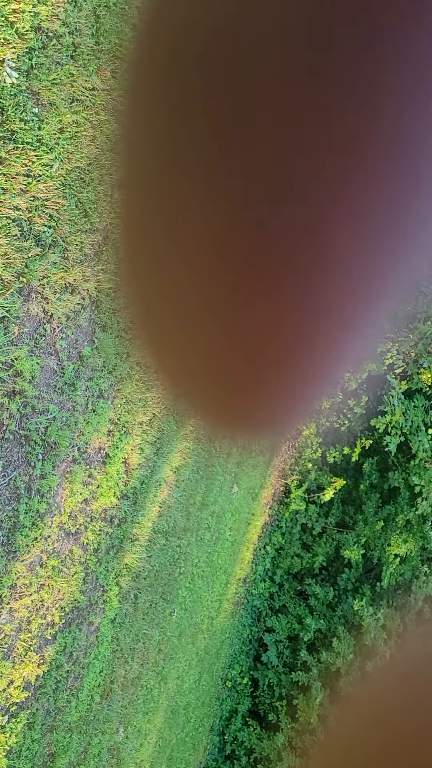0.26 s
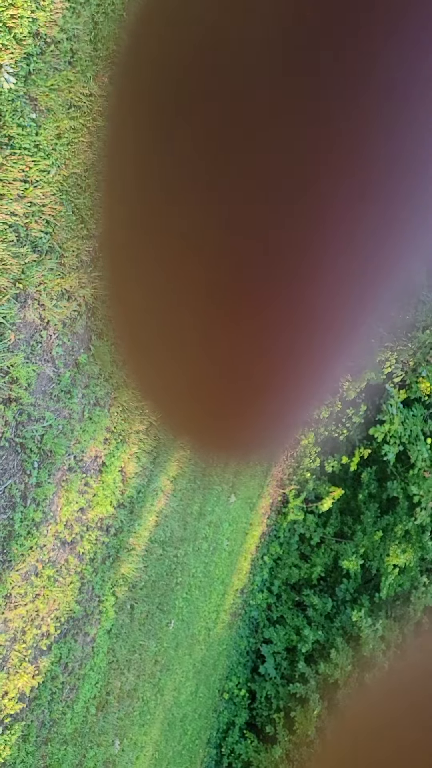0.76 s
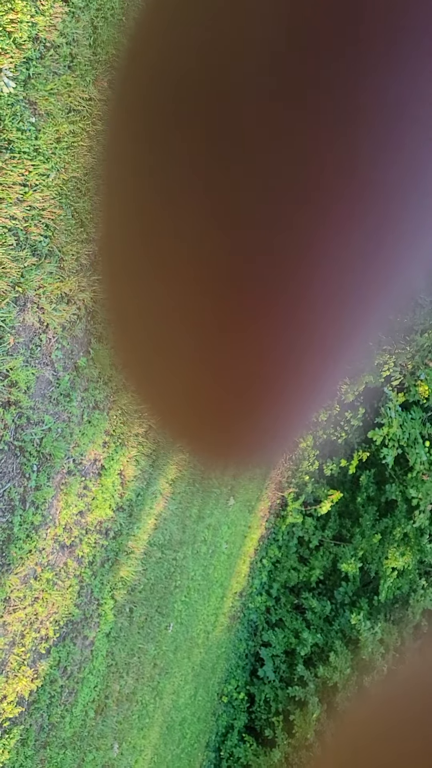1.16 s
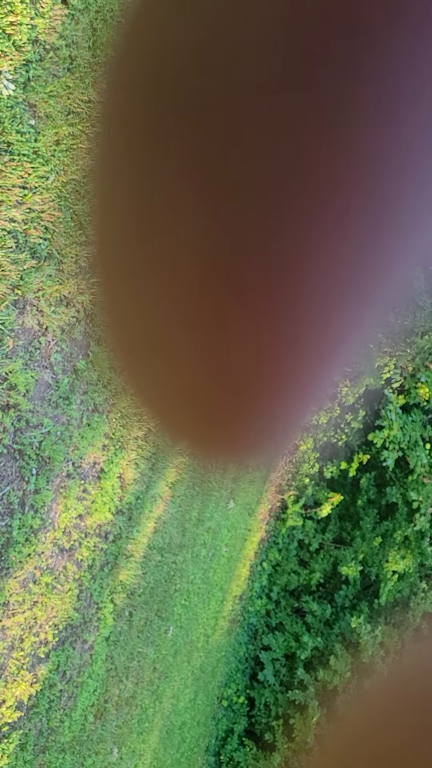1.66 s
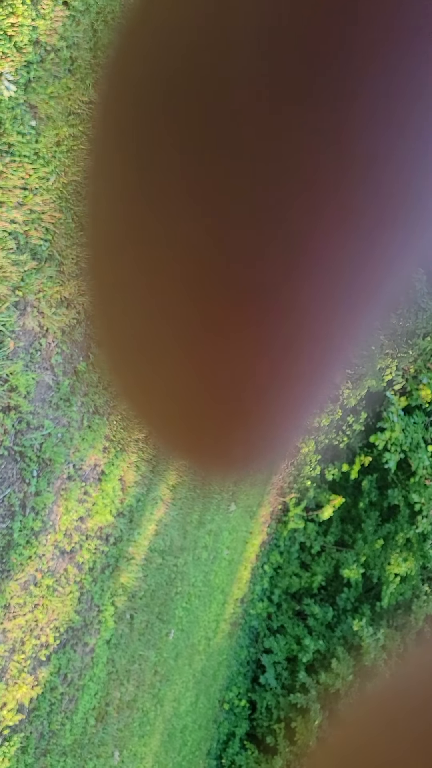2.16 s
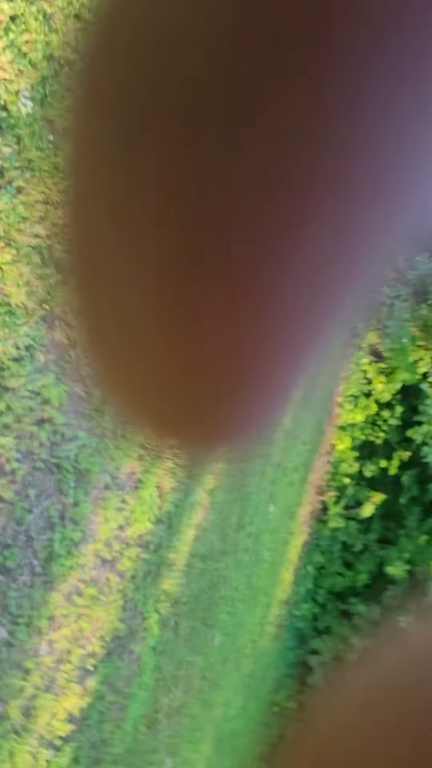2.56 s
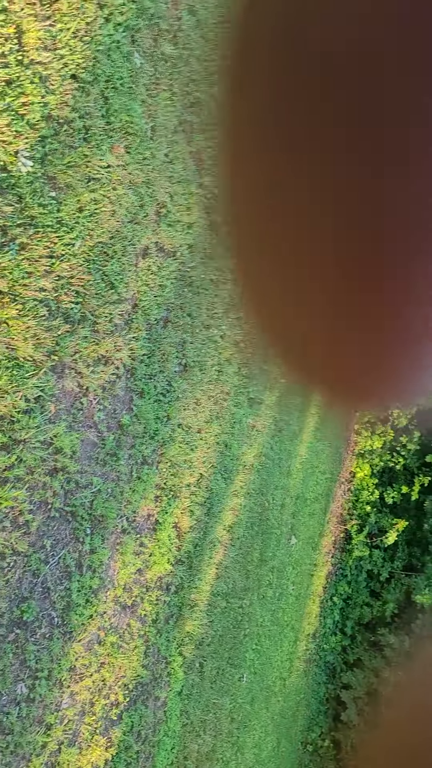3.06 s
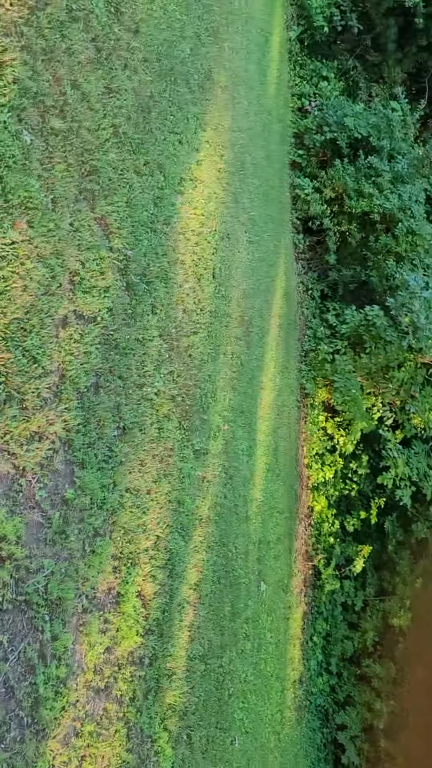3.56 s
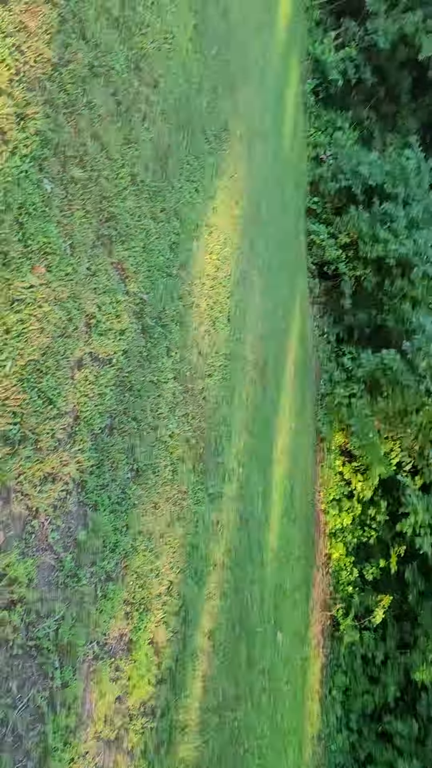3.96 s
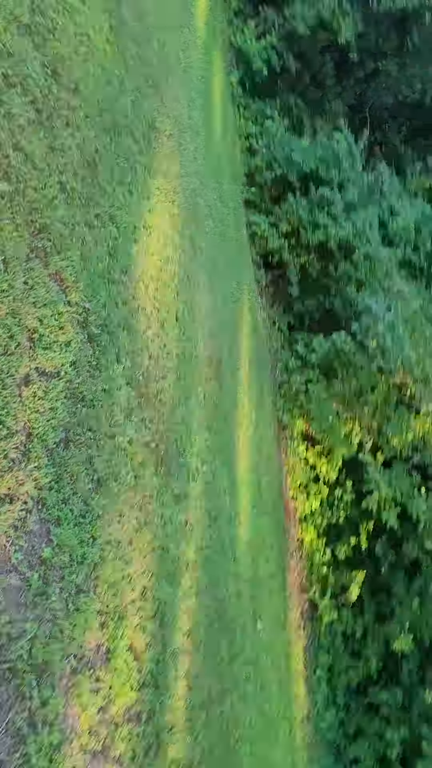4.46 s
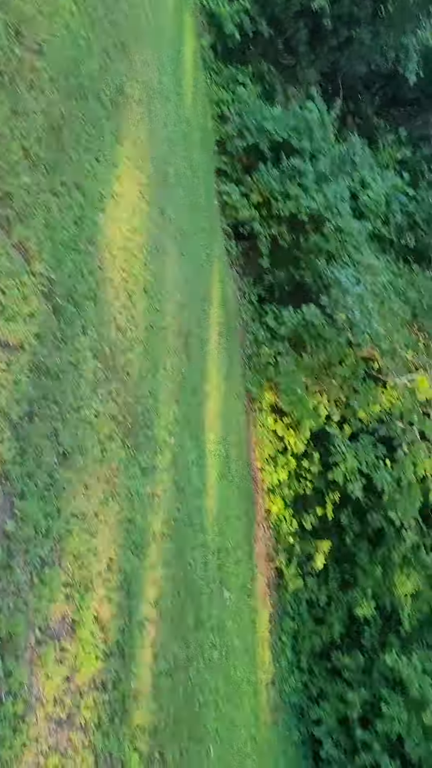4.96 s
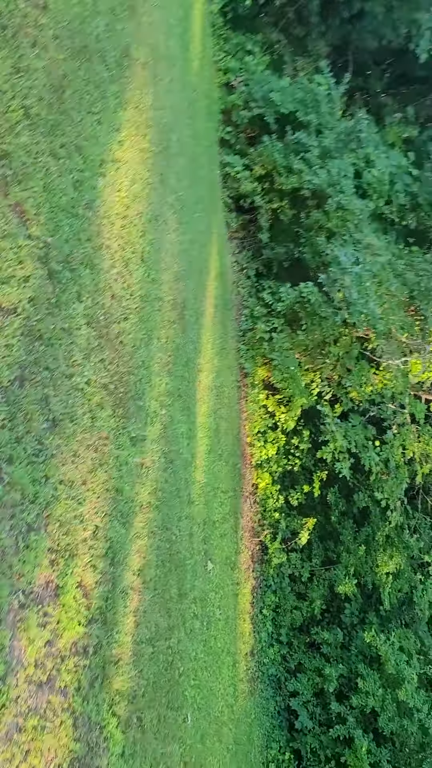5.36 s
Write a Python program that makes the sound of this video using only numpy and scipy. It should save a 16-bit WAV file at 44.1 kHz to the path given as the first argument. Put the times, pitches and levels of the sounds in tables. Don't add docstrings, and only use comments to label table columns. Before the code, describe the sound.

A faint throbbing bird whistle over soft outdoor hiss gives way to skin rubbing, fingers knocking and low thumps on a handheld phone.

```python
import sys
import numpy as np
from scipy import signal
from scipy.fft import rfft, irfft, next_fast_len
from scipy.io import wavfile

SR = 44100
rng = np.random.default_rng(int(sys.argv[2]) if len(sys.argv) > 2 else 0)


def boost(x):
    u = np.asarray(x, float) / 20
    return 10 ** u


def pcm_store(signal):
    levels = np.round(np.clip(np.atleast_2d(signal), -1, 1) * 32767)
    wavfile.write(sys.argv[1], SR, levels.astype(np.int16).T)


N = 247479


def rms_one(x):
    return x / np.sqrt(np.mean(x ** 2) + 1e-20)


def peak_one(x):
    return x / np.max(np.abs(x))


def in_time(rows):
    s, *columns = np.transpose(rows)
    t = np.arange(N) / SR
    gate = np.interp(t, [s[0] - .004, s[0], s[-1], s[-1] + .004], [0, 1, 1, 0])
    return [gate] + [np.interp(t, s, c) for c in columns]


def drift(rate_hz):
    r = np.exp(-80 * np.pi * rate_hz / SR)
    noise = rng.standard_normal(N // 40 + 2002)
    slow = signal.lfilter([1], [1, -2 * r, r * r], noise)[2000:]
    return np.interp(np.arange(N) / 40, np.arange(len(slow)), rms_one(slow))


def coloured(x, spectrum):
    size = next_fast_len(N)
    hz = np.maximum(np.arange(size // 2 + 1) * SR / size, 1)
    points = np.array(spectrum)
    gain = boost(np.interp(np.log(hz), np.log(points[:, 0]), points[:, 1]))
    return rms_one(irfft(rfft(x, size) * gain, size)[..., :N])


def band(x, low_hz, high_hz):
    return signal.sosfilt(signal.butter(2, [low_hz, min(high_hz, .45 * SR)], "band", fs=SR, output="sos"), x)


def dull(x, hz):
    return signal.sosfilt(signal.butter(2, hz, fs=SR, output="sos"), x)


def ring(x, hz, t60):
    r, w = boost(-60 / (t60 * SR)), 2 * np.pi * hz / SR
    return signal.lfilter([0, np.sin(w)], [1, -2 * r * np.cos(w), r * r], x)


def delayed(x, seconds):
    return np.interp(np.arange(len(x)) - seconds * SR, np.arange(len(x)), x, left=0)


def swell(top_s, held_s, rise_db_per_s, fall_db_per_s):
    t = np.arange(N) / SR - top_s
    return np.minimum(rise_db_per_s * t, 0) - fall_db_per_s * np.maximum(t - held_s, 0)


def pan(db):
    return np.array([boost(np.asarray(db) / 2), boost(-np.asarray(db) / 2)])


def add(out, s, pulse, pan_db):
    at = round(s * SR)
    out[:, at:at + pulse.shape[-1]] += (pan(pan_db)[:, None] * pulse)[:, :N - at]


def meadow():
    # hz, level_db (per Hz)
    air_mid = [(15, -57), (25, -7), (64, 0.5), (129, -7.5), (156, -6.5), (186, -5.5), (277, -12.5),
               (492, -14.5), (824, -15), (997, -24), (1250, -24), (1430, -28.5), (2400, -38.5), (3120, -45),
               (5280, -120)]
    # hz, level_db (per Hz)
    air_side = [(15, -59), (25, -24), (65, -6.5), (122, -7.5), (153, 3.5), (193, -28), (225, -4),
                (473, -8.5), (501, -5), (707, -6), (2400, -24.5), (3120, -74), (5280, -120)]
    # pitch_hz, width_hz, level_db
    hum = [
        (79, 6.6, -73.5),
        (150.2, 20.3, -69.5),
        (226.6, 10.6, -76.5),
    ]
    port_lag_s, self_noise_db = 0.00035, -95
    common, other = rfft(rng.standard_normal((2, N)))
    hz = np.arange(len(common)) * SR / N
    tied = 0.55 * np.tanh(2.5 * np.sin(2 * np.pi * hz * port_lag_s)) * np.exp(-hz / 3000)
    opposed = irfft(1j * tied * common + np.sqrt(1 - tied ** 2) * other, N)
    mid = boost(-64 + 1.1 * drift(2.1)) * coloured(irfft(common, N), air_mid)
    side = boost(-67.5 + 1.7 * drift(0.76)) * coloured(opposed, air_side)
    for pitch_hz, width_hz, db in hum:
        mid = mid + boost(db) * rms_one(band(rng.standard_normal(N), pitch_hz - width_hz / 2, pitch_hz + width_hz / 2))
    return np.array([mid + side, mid - side]) + boost(self_noise_db) * rng.standard_normal((2, N))


def leaves():
    # hz, level_db (per Hz)
    foliage = [(1180, -23), (2000, -2), (2200, -1.5), (2570, -4.5), (2970, 2), (3180, 4), (3530, 0),
               (3840, 0.5), (4530, -9), (5370, -2), (6330, -9), (7200, -23.5), (8920, -16.5), (9980, -36),
               (15600, -25.5)]
    # hz, left_over_right_db
    lean = [(2000, -2), (4400, -10), (6500, 7), (8100, -1.5), (10000, -4), (15000, 1)]
    hz, db = np.transpose(foliage)
    lean_db = np.interp(hz, *np.transpose(lean)) / 2
    ports = [coloured(rng.standard_normal(N), np.c_[hz, db + sign * lean_db]) for sign in (1, -1)]
    return boost(-73.5) * np.array(ports)


def tone(hz, db, scatter):
    phase = 2 * np.pi * np.cumsum(hz) / SR
    flutter = [scatter * drift(35) for path in range(4)]
    return np.array([boost(db + 8 + 12 * flutter[k]) * np.sin(phase + 1.6 * flutter[k + 2] - 2.3 * k)
                     for k in range(2)])


def whistles(rows, sag_hz, scatter):
    t = np.arange(N) / SR
    db = np.array([top_db + swell(s, held_s, 400, fade) for s, _, top_db, held_s, fade in rows])
    hz = np.array([top_hz - sag_hz * np.clip((t - s) / (held_s + 0.031), 0, 2)
                   for s, top_hz, _, held_s, _ in rows])
    sounding_hz = np.take_along_axis(hz, db.argmax(axis=0)[None], axis=0)[0]
    return pan(2.5)[:, None] * tone(sounding_hz, db.max(axis=0), scatter)


def coo():
    # top_hz, top_db, lower_hz (at the ends), lower_db (at the ends)
    partials = [
        (1680, -76.5, 45, 8),
        (2246, -73.5, 100, 1.5),
    ]
    middle_s, half_s = 1.006, .054
    arch = ((np.arange(N) / SR - middle_s) / half_s) ** 2
    return sum(tone(hz - lower_hz * np.minimum(arch, 2), db - lower_db * arch - 3 * arch ** 4, scatter=.13)
               for hz, db, lower_hz, lower_db in partials)


def trill():
    start_s, end_s = 0.35, 0.85
    since = np.maximum(np.arange(N) / SR - start_s, 0)
    db = -72.5 - 23 * since + swell(start_s, end_s - start_s, 2000, 60)
    edge_hz = np.maximum(6760 - 22000 * since, 3300)
    out = np.zeros((2, N))
    for hz, tint_db in [(3800, -4), (4350, 3.0), (5000, 2.0), (5400, 5), (6000, -2.5), (6500, -6.0)]:
        reached = 1 / (1 + np.exp((edge_hz - hz) / 120))
        out += reached * boost(db + tint_db) * rms_one(band(rng.standard_normal((2, N)), .965 * hz, 1.035 * hz))
    return out


def birds():
    # loudest_s, pitch_hz, level_db, held_s, fade_db_per_s
    long_whistle = [
        (.012, 2636, -65, .006, 800),
        (.062, 2586, -63, .018, 330),
        (.135, 2580, -63.5, .045, 220),
        (.235, 2582, -67.5, .02, 250),
        (.305, 2572, -67, .012, 250),
        (.365, 2584, -70.5, .02, 250),
        (.44, 2590, -71.5, .02, 300),
        (.515, 2580, -81, .01, 300),
        (.575, 2565, -80, .04, 150),
    ]
    # loudest_s, pitch_hz, level_db, held_s, fade_db_per_s
    later_notes = [
        (3.79, 2770, -71, .005, 350),
        (4.228, 2775, -67.5, .03, 220),
        (4.362, 2800, -73.5, .01, 300),
        (4.575, 3020, -73.5, .012, 400),
        (4.608, 3140, -77, .01, 400),
        (4.645, 2800, -73, .035, 300),
        (4.768, 2460, -78, .003, 900),
        (4.785, 2800, -80, .07, 200),
    ]
    calls = whistles(later_notes, sag_hz=55, scatter=.27) + whistles(long_whistle, sag_hz=8, scatter=.19)
    return calls + trill() + coo()


def far_port(x):
    turn_hz, lag_s = 92, 0.00015
    mode_hz, mode_width_hz, mode_db = 440, 295, -6
    k = np.tan(np.pi * turn_hz / SR)
    turned = signal.lfilter([(k - 1) / (k + 1), 1], [1, (k - 1) / (k + 1)], x[1])
    case = boost(mode_db) * band(turned, mode_hz - mode_width_hz / 2, mode_hz + mode_width_hz / 2)
    port = 0.87 * band(turned, 2700, 3300)
    return np.array([x[0], delayed(turned + case + port, lag_s)])


def palm(x):
    # time_s, pocket_lift_db
    grip = [
        (2.6, -9),
        (3.2, -4),
        (3.36, -6.5),
        (3.56, 3),
        (3.72, -1),
        (3.92, -1),
        (4.3, 1.5),
        (4.5, 3.5),
        (4.72, 0.3),
        (5.3, -2),
    ]
    pocket = signal.lfilter(*signal.butter(1, [1680, 2690], "band", fs=SR), x + 1e-18)
    return x + (boost(in_time(grip)[1]) - 1) * pocket


def ticks(rows, broad_db):
    out, t = np.zeros((2, N)), np.arange(round(.02 * SR)) / SR
    for s, db, hz, pan_db in rows:
        snap = rng.standard_normal(len(t)) * boost(-60 * t / 0.0081)
        narrow = peak_one(band(snap, 0.934 * hz, 1.146 * hz))
        broad = boost(broad_db) * peak_one(band(snap, 800, 5500))
        add(out, s, boost(db + 0.5) * dull(narrow + broad, 9400), pan_db)
    return out


def nails_and_skin():
    # time_s, peak_db, pitch_hz, pan_left_db
    nail_ticks = [(2.0485, -55.5, 5500, 13), (2.0657, -57, 6100, 12), (2.135, -60, 4480, 1.5),
                  (2.6559, -54.5, 5400, 18), (2.8609, -59.5, 3150, -11), (3.3098, -47.5, 3000, 15),
                  (3.341, -55, 2840, 3), (3.5189, -39, 5400, 9.5), (3.8531, -54, 4160, 9),
                  (3.9022, -23.5, 2710, 3), (3.919, -37.5, 2050, 12), (4.3685, -55, 5850, 21),
                  (4.561, -47, 4860, -2), (5.0978, -44.5, 2500, 2), (5.2744, -38, 1880, 1)]
    # time_s, peak_db, pitch_hz, pan_left_db
    skin_snaps = [(2.0053, -64, 5660, 8), (2.6035, -57, 2820, 25), (2.604, -48, 3850, 7),
                  (2.6204, -52, 4230, 18), (2.6604, -55, 4020, -4), (3.5314, -49, 4770, 13),
                  (3.6371, -41, 2840, 6), (3.9274, -50, 4400, 8), (3.9933, -53, 2430, -1),
                  (4.2544, -62, 2640, 6), (4.5374, -42, 4120, 11), (4.6967, -47, 4550, 11),
                  (4.6968, -44.5, 1780, 11), (4.9244, -57, 4270, 17)]
    return ticks(nail_ticks, broad_db=-34) + ticks(skin_snaps, broad_db=5)


def thumps():
    # time_s, peak_db, pitch_hz, pan_left_db, right_lag_cycles
    pushes = [(2.63, -52, 80, -9, 0.24), (2.699, -53, 141, -15, 0.21), (3.364, -21, 183, 6.5, 0.23),
              (3.557, -21.5, 89, 9, 0.35), (3.578, -29, 81, 3.5, 0.18), (3.658, -29.5, 63, -11.5, 0.15),
              (3.9, -28, 175, -8, 0.58), (4.251, -44.5, 158, -8, 0.13), (4.508, -33, 120, 5, 0.14),
              (4.519, -33.5, 83, 5, 0.13), (4.538, -30, 73, 5, 0.11), (4.712, -34, 85, 17.5, 0.33),
              (5.244, -36, 67, 2.5, 0.12), (5.249, -36, 189, -1, 0.16), (5.47, -43.5, 177, 7, .2)]
    out, t = np.zeros((2, N)), np.arange(round(.12 * SR)) / SR
    for s, db, hz, pan_db, lag_cycles in pushes:
        push = np.sin(np.pi * np.minimum(2 * hz * t, 1)) ** 2
        swing = peak_one(band(ring(push, hz, 1.85 / hz), 0.7 * hz, 890))
        add(out, s, -boost(db + 0.5) * np.array([swing, delayed(swing, lag_cycles / hz)]), pan_db)
    return out


def knocks(rows, cycles):
    out, t = np.zeros((2, N)), np.arange(round(.06 * SR)) / SR
    for s, left_db, hz, crack_db, right_db in rows:
        t60 = cycles / hz
        contact = np.sin(np.pi * np.minimum(4.4 * hz * t, 1)) ** 2
        near = ring(contact, 1.23 * hz, t60) - 0.86 * ring(contact, 2.59 * hz, 0.14 * t60)
        far = delayed(np.gradient(ring(near, 0.941 * hz, 2.04 * t60)), 0.017 / hz)
        crack = peak_one(band(rng.standard_normal((2, len(t))) * boost(-60 * t / 0.0046), 830, 4040))
        pulse = np.array([-peak_one(near), peak_one(far)]) + boost(crack_db) * dull(crack, 5100)
        add(out, s, boost([[left_db], [right_db]]) * pulse, 0)
    return out


def finger_blows():
    # time_s, left_peak_db, case_ring_hz, crack_db (relative to the ring), right_peak_db
    fingertips = [(2.6224, -29.5, 406, -14, -33), (2.6748, -33.5, 390, -10, -48),
                  (2.6918, -36, 392, -5, -39.5), (3.2031, -35, 400, -8, -39.5),
                  (3.3145, -18, 403, -11.5, -21.5), (3.3411, -14, 455, 1.5, -16),
                  (3.3577, -14, 324, -6, -16.5), (3.5508, -15, 292, -2, -24.5),
                  (3.8745, -13.5, 400, -10.5, -17.5), (3.9027, -15.5, 313, 0.5, -11.5),
                  (3.9351, -50, 405, -3, -34), (4.298, -33.5, 332, 2.5, -55), (4.4628, -9.5, 452, -30, -13),
                  (4.4645, -2.5, 444, -26, -24), (4.4937, -12.5, 440, -19, -23),
                  (4.6978, -28, 474, -2, -30.5), (4.712, -26, 210.5, -20, -22.5),
                  (4.8308, -37, 395, -6, -42), (5.0985, -25, 362, -12.5, -33), (5.2426, -29, 408, -13, -37),
                  (5.2719, -33, 305, -21, -33.5), (5.4708, -27.5, 350, -10.5, -37)]
    small_taps = [
        (0.953, -61, 873, -11, -48),
        (5.5095, -49, 730, 0, -48),
    ]
    cupped_knocks = [
        (4.4605, -19.5, 425, -26, -18),
        (4.901, -38, 434, -20, -38),
        (4.9224, -29, 430, -7, -29.5),
        (4.9487, -17.5, 437, -11.5, -23.5),
        (4.973, -34, 404, -16, -42),
        (5.051, -33, 420, -22, -36),
    ]
    return knocks(fingertips, cycles=3.58) + knocks(small_taps, cycles=16) + knocks(cupped_knocks, cycles=6.5)


def grains(per_s, spread_db):
    sizes = boost(spread_db * np.minimum(rng.exponential(1, N), 4)) * rng.choice([-1, 1], N)
    return sizes * (rng.random(N) < per_s / SR)


def cupped():
    # time_s, level_db, pan_left_db
    slide = [
        (4.854, -67, 20),
        (4.86, -46, 8),
        (4.9, -47.5, 10),
        (4.945, -52.5, 23),
        (4.955, -44.5, 13.5),
        (5.0, -39.5, 7),
        (5.04, -50, 15),
        (5.06, -63, 16),
    ]
    # hz, level_db (per Hz)
    open_hollow = [(71, -46), (120, -12), (310, -10), (569, -0.5), (770, -8), (1410, -16), (1630, -26.5),
                   (5570, -27), (15000, -77)]
    # hz, level_db (per Hz)
    closed_hollow = [(120, -43), (200, -8.5), (383, -2.5), (513, 2), (620, -4), (711, -6.5), (1130, -14.5),
                     (1320, -6), (1890, -33), (2250, -9.5), (2660, -25), (3500, -26), (4080, -16),
                     (4840, -35), (10500, -46), (12000, -58), (15600, -80), (22000, -120)]
    palm_closes_s = 4.945
    gate, db, pan_db = in_time(slide)
    slips = grains(5000, spread_db=3.5) + 0.67 * np.array([grains(5000, spread_db=3.5) for side in range(2)])
    still_open = np.arange(N) < palm_closes_s * SR
    ringing = np.where(still_open, coloured(slips, open_hollow), coloured(slips, closed_hollow))
    return gate * boost(db + drift(45)) * pan(pan_db) * ringing


def settled(gain):
    tail_db, tail_s = -19, 0.031
    r = np.exp(-1 / (tail_s * SR))
    return gain + boost(tail_db) * signal.lfilter([1 - r], [1, -r], gain + 1e-18)


def stroke_gains():
    # start_s, end_s, hiss_start_db, hiss_end_db, case_rumble_over_hiss_db
    brushes = [(2.563, 2.58, -61, -58.5, -15), (2.596, 2.64, -65.5, -67, 0.5),
               (3.539, 3.557, -48, -26.5, -11), (3.633, 3.698, -53.5, -41.5, -15),
               (3.7, 3.792, -45.5, -45.5, -11.5), (4.135, 4.198, -60, -68, -7),
               (4.554, 4.598, -66, -81, -12), (4.956, 5.068, -61, -60, -8), (5.075, 5.18, -67.5, -64.5, -2),
               (5.185, 5.244, -65.5, -63.5, -5), (5.349, 5.408, -68.5, -59.5, -7.5)]
    firm_rubs = [(2.65, 2.705, -58, -60.5, -4), (3.34, 3.372, -35.5, -55.5, -7.5),
                 (3.561, 3.582, -37.5, -49, -4.5), (3.799, 3.916, -62, -49, -3.5),
                 (3.898, 3.952, -44, -53, -3), (3.953, 3.984, -55, -58.5, -6),
                 (3.994, 4.122, -75.5, -57.5, -3.5), (4.116, 4.131, -46, -43, -23),
                 (4.198, 4.275, -57.5, -65, -2), (4.493, 4.545, -38.5, -41.5, -10),
                 (4.708, 4.735, -44.5, -45.5, -9.5), (4.745, 4.85, -77, -66.5, -15),
                 (4.854, 4.883, -66, -48.5, -26), (5.237, 5.284, -50, -52, -12),
                 (5.286, 5.326, -68, -50, -13.5), (5.324, 5.351, -59, -63, -24)]
    drags = [
        (3.182, 3.289, -64, -64.5, -8),
        (3.303, 3.337, -55, -46, -5.5),
        (4.284, 4.316, -47, -53.5, -6.5),
        (4.311, 4.41, -63, -62, -10),
        (4.414, 4.483, -66.5, -49, 1.5),
        (4.465, 4.49, -42.5, -43, -4),
    ]
    t = np.arange(N) / SR
    hiss, treble, body = np.zeros((3, N))
    for strokes, treble_db in [(brushes, 7.5), (firm_rubs, 2), (drags, -6.5)]:
        for start, end, first_db, last_db, body_db in strokes:
            on = np.interp(t, [start - .003, start + .003, end - .008, end + .007], [0, 1, 1, 0])
            level = on * boost(np.interp(t, [start, end], [first_db, last_db]))
            hiss += level
            treble += level * boost(treble_db)
            body += level * boost(body_db)
    return settled(np.array([hiss, treble, body]))


def rubs():
    # hz, level_db (per Hz)
    hiss_spectrum = [(710, -99), (1200, -3), (1690, -13), (2120, 6.5), (2770, 1.5), (3220, 1.5),
                     (3740, -2.5), (6330, -10.5), (12600, -32.5), (15600, -45)]
    # hz, level_db (per Hz)
    body_spectrum = [(88, -31), (150, 0), (369, 1), (546, -2), (846, -5), (1310, -14), (1680, -16),
                     (2200, -30), (2860, -49), (4840, -120)]
    # tightest_s, pumping_db, pan_left_db
    squeezes = [(2.632, -53.5, 0.5), (3.17, -56.5, 3), (3.39, -61.5, 11), (3.624, -42, -1.5),
                (3.91, -43, 2), (4.229, -55.5, -1), (4.46, -53, 6.5), (4.75, -76, 7), (4.87, -63, 6),
                (5.081, -52.5, 0), (5.27, -55, 1.5), (5.49, -60, -4)]
    hiss_gain, treble_gain, body_gain = stroke_gains()
    pump_gain = sum(boost(db + swell(s, 0, 214, 127)) for s, db, _ in squeezes)
    pan_db = in_time(squeezes)[2]
    shake_db = 0.64 * drift(85)
    shared = grains(4000, spread_db=1.5)
    own = np.array([grains(3000, spread_db=2.5) for side in range(2)])
    hiss = boost(shake_db - 3.0) * coloured(shared + 9.8 * own, hiss_spectrum)
    treble = signal.sosfilt(signal.butter(2, 4500, "high", fs=SR, output="sos"), hiss)
    body = boost(12.0 + 1.9 * shake_db) * coloured(shared + 0.46 * own, body_spectrum)
    slide = hiss_gain * (hiss - treble) + treble_gain * pan(3.1)[:, None] * treble + body_gain * body
    lumps = rng.standard_normal(N) + 1.16 * rng.standard_normal((2, N))
    pump = pump_gain * rms_one(band(lumps, 37, 234))
    return pan(pan_db) * slide, pan(pan_db) * pump


def scene():
    background = meadow() + leaves() + birds()
    slide, pump = rubs()
    blows = finger_blows() + thumps()
    handling = palm(far_port(slide) + blows) + far_port(cupped() + nails_and_skin())
    return background + handling + pump


def band_limit(x):
    return signal.sosfilt(signal.butter(12, 15750, fs=SR, output="sos"), x)


def record(dry):
    cut = signal.sosfilt(signal.butter(3, 45, "high", fs=SR, output="sos"), dry)
    return band_limit(cut)


dry = scene()
out = record(dry)
pcm_store(out)
```